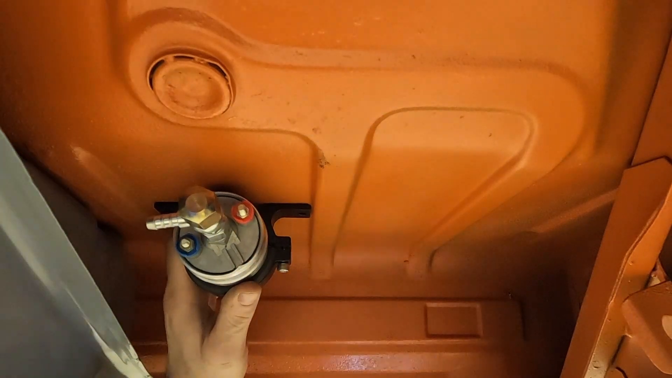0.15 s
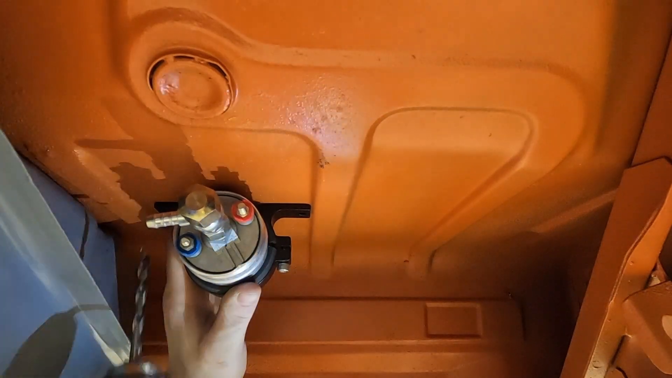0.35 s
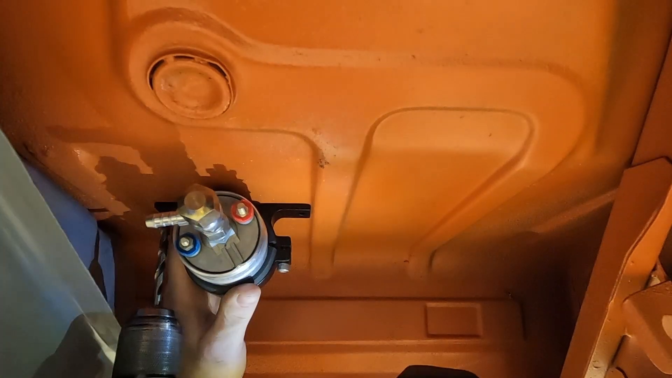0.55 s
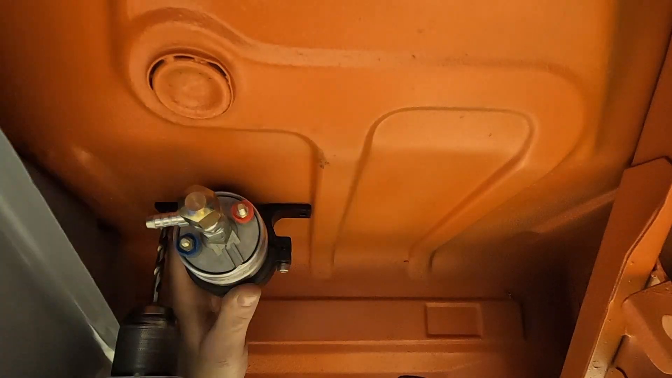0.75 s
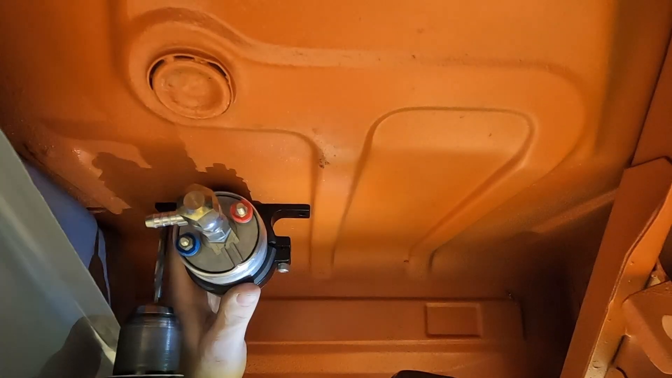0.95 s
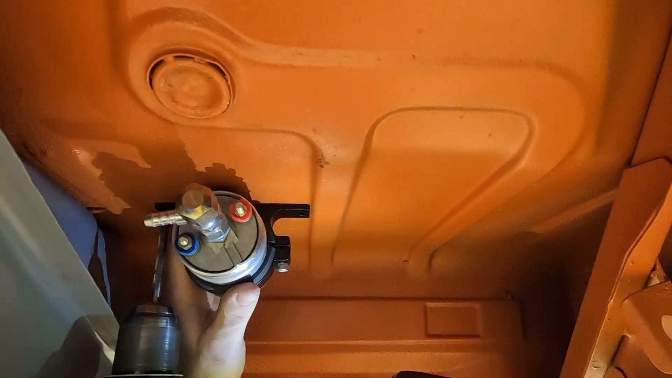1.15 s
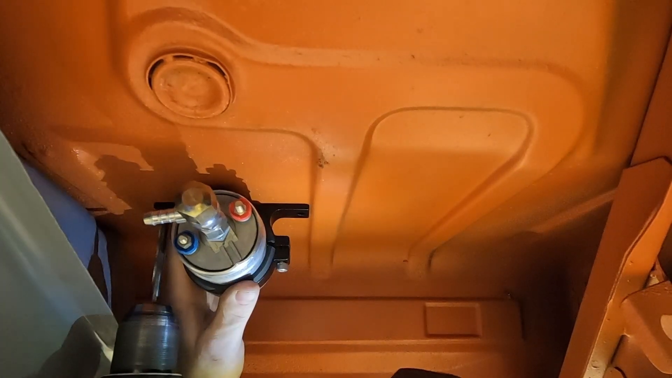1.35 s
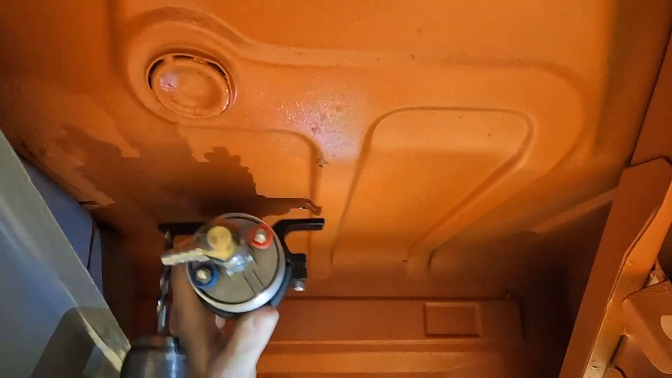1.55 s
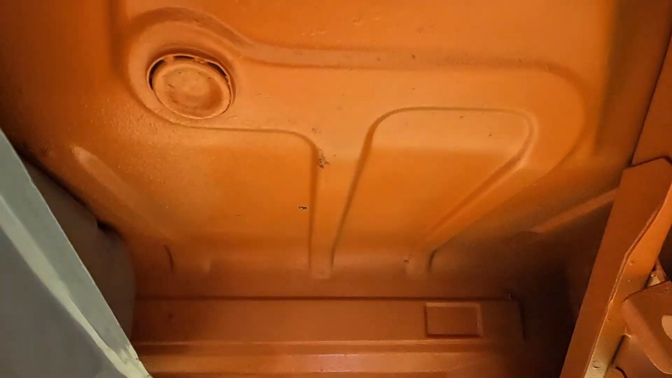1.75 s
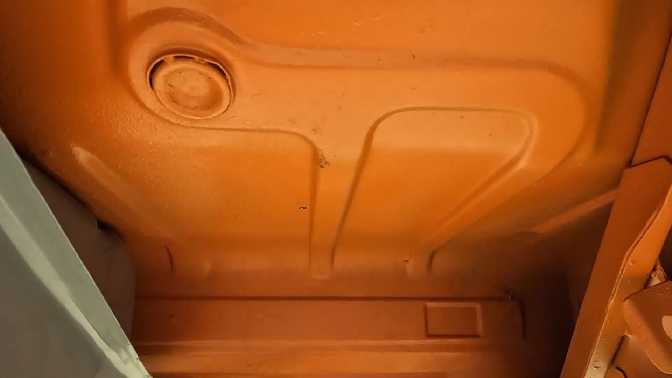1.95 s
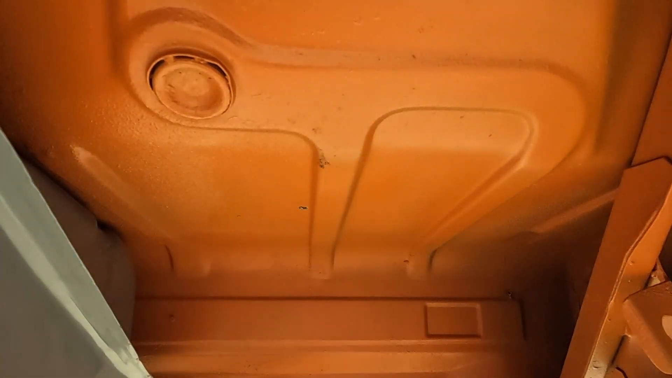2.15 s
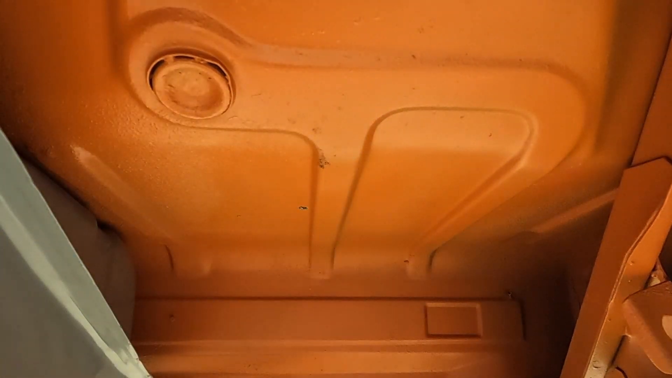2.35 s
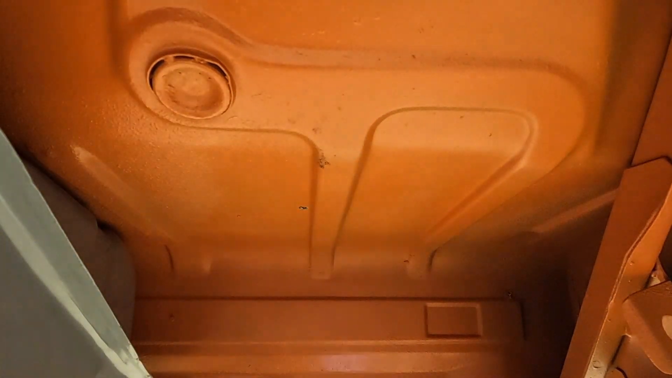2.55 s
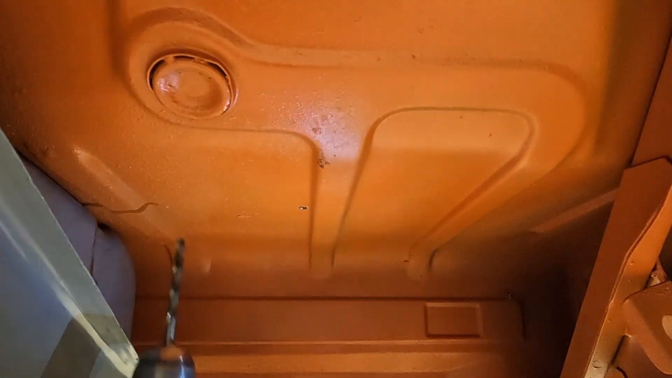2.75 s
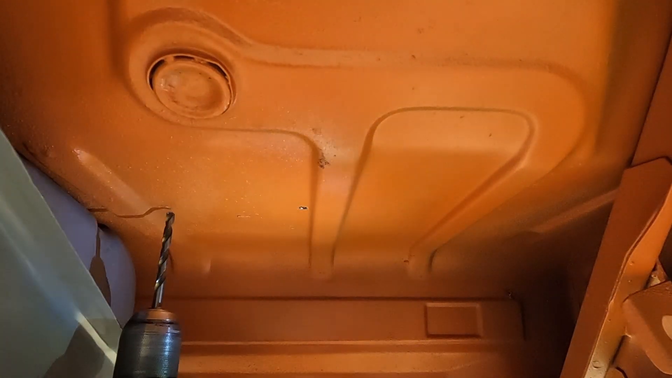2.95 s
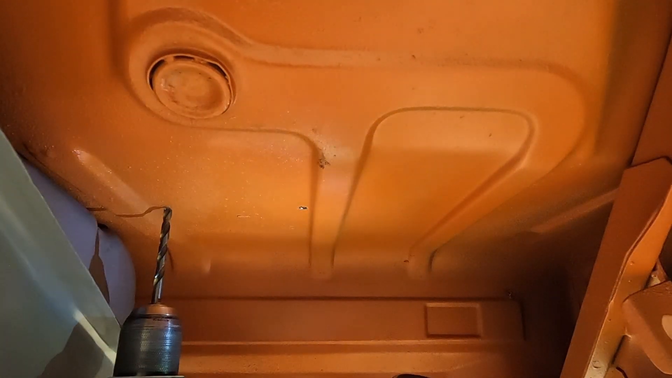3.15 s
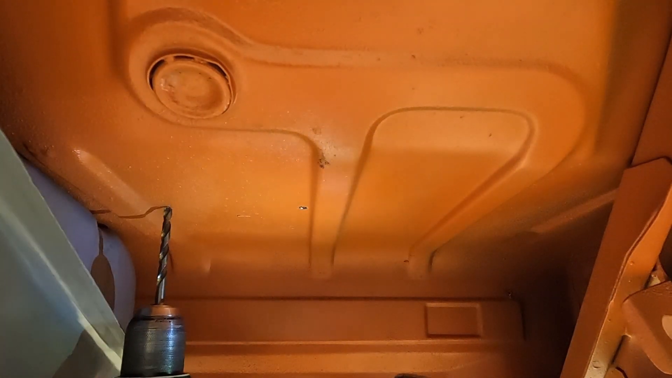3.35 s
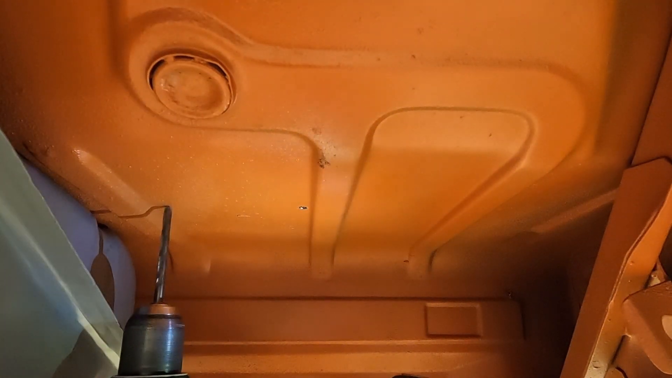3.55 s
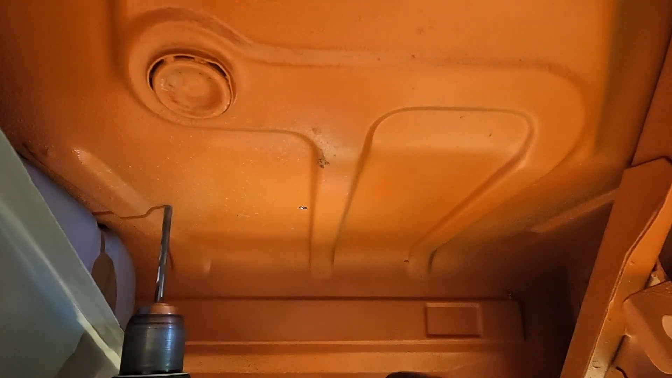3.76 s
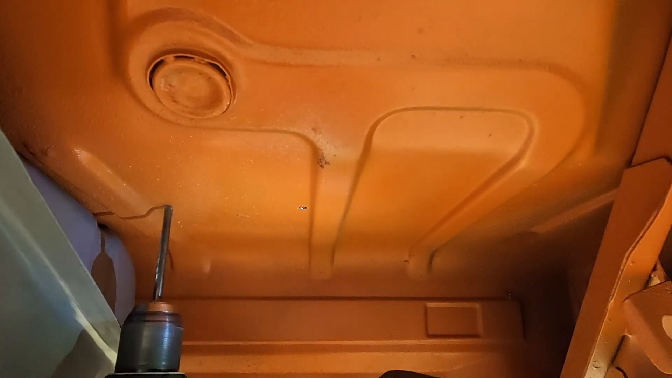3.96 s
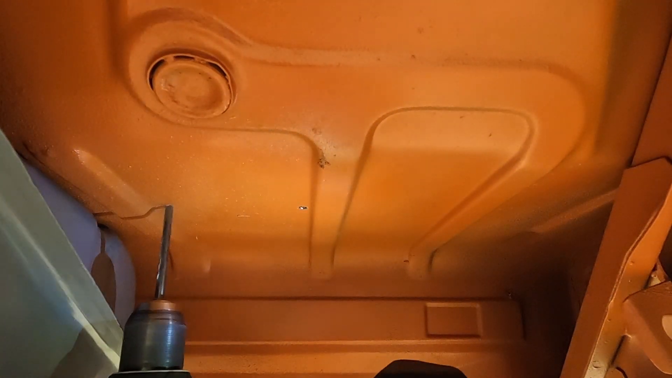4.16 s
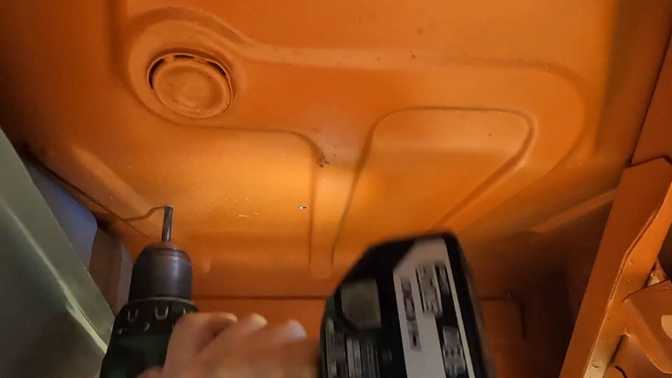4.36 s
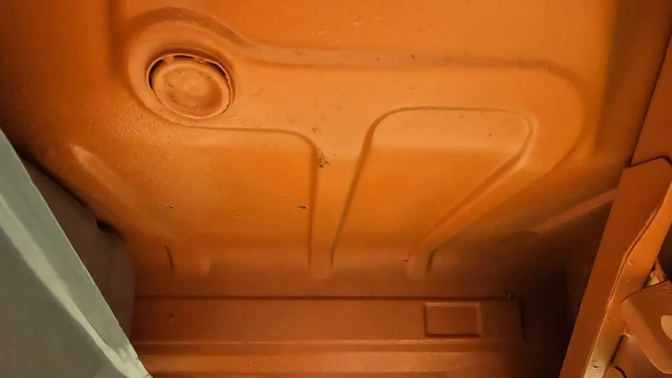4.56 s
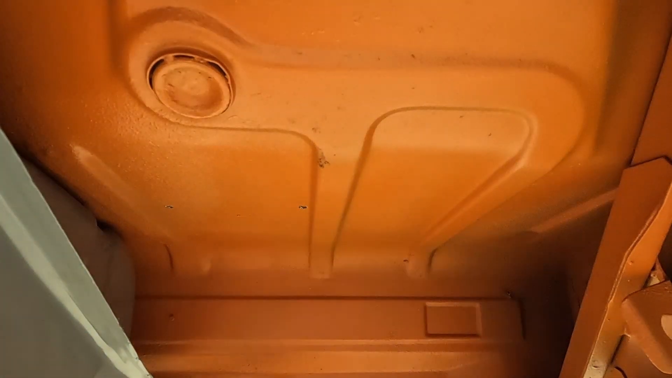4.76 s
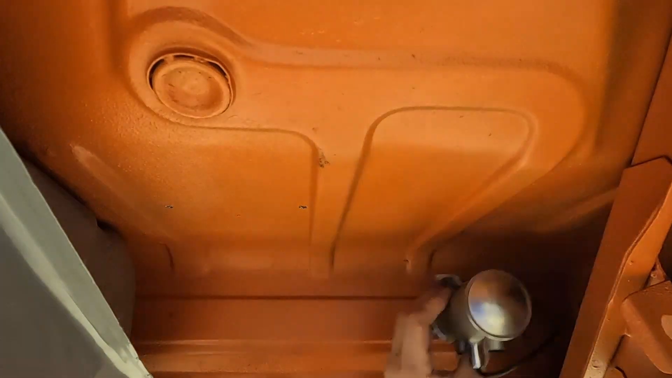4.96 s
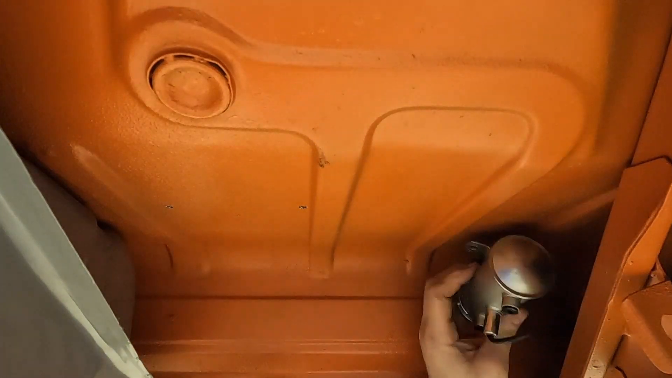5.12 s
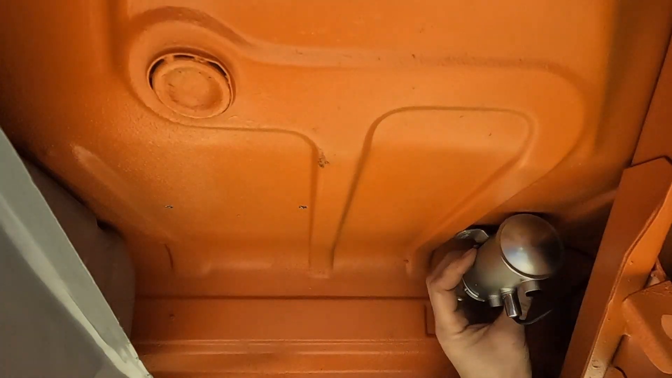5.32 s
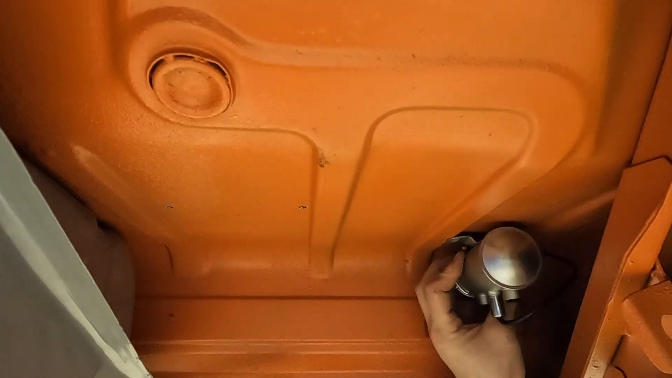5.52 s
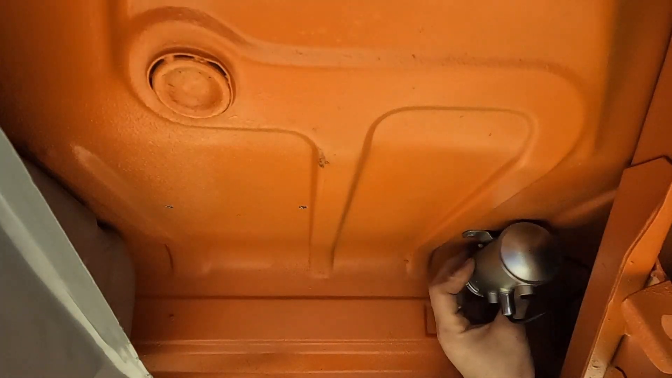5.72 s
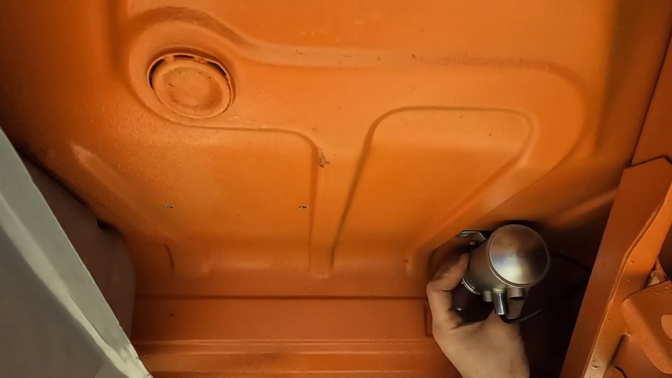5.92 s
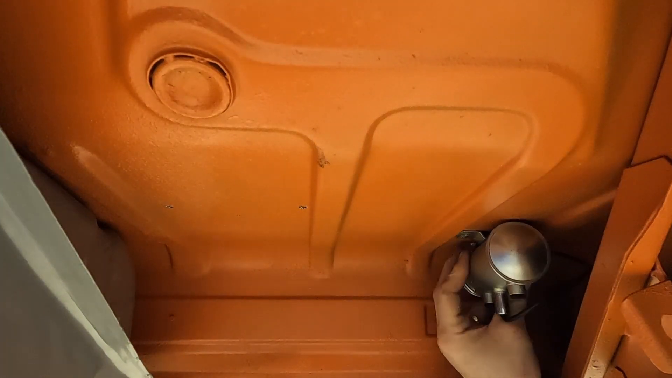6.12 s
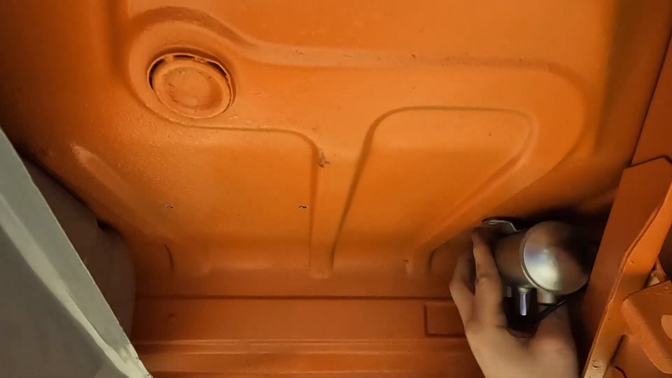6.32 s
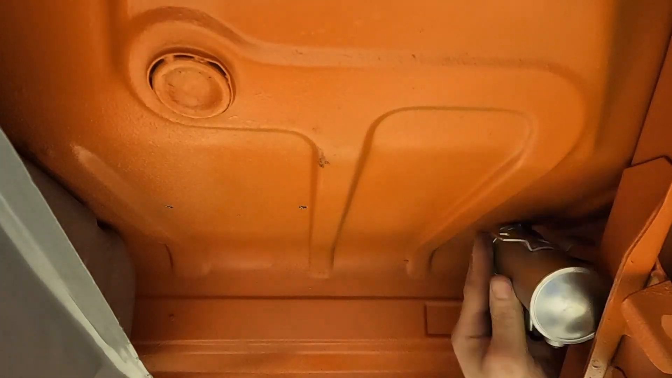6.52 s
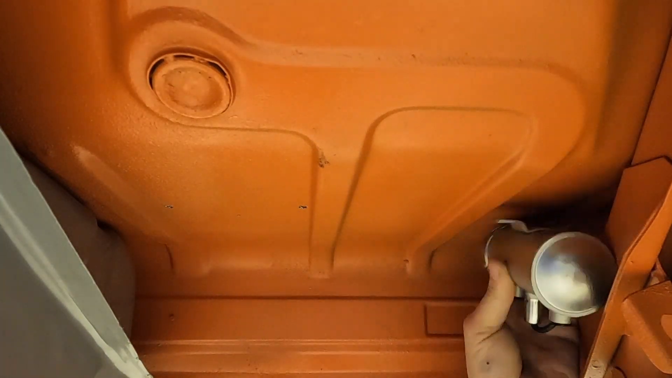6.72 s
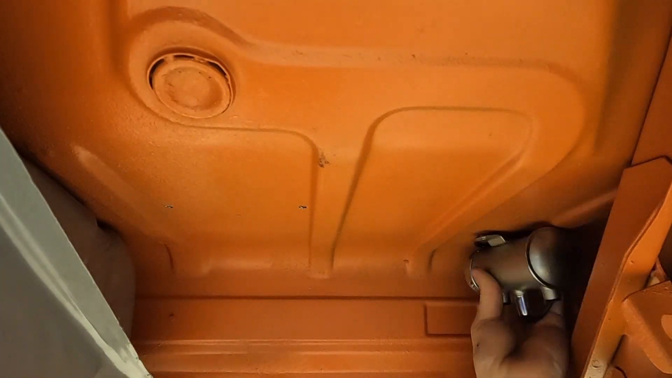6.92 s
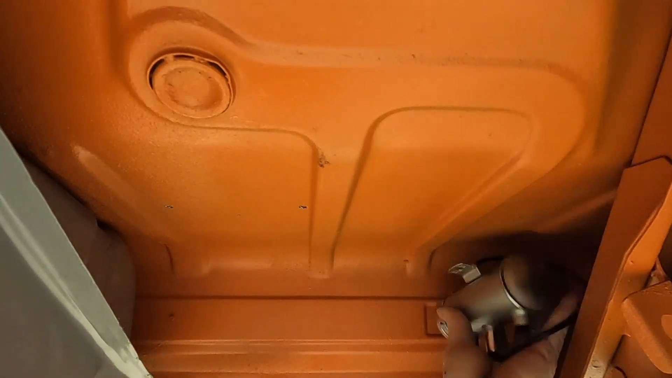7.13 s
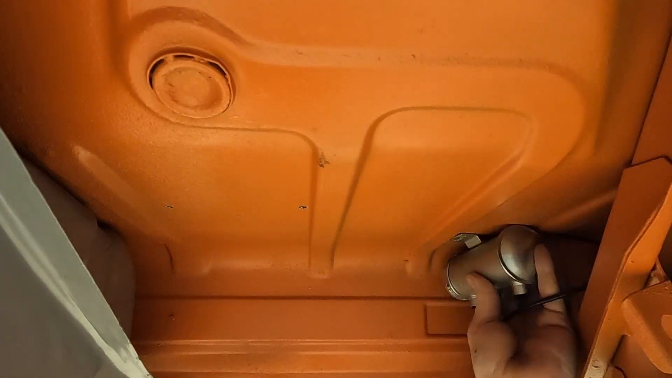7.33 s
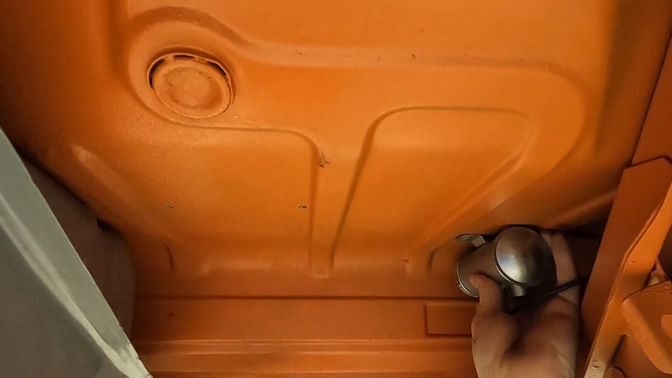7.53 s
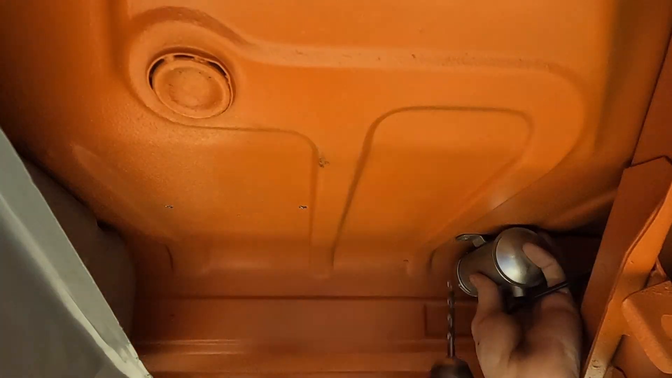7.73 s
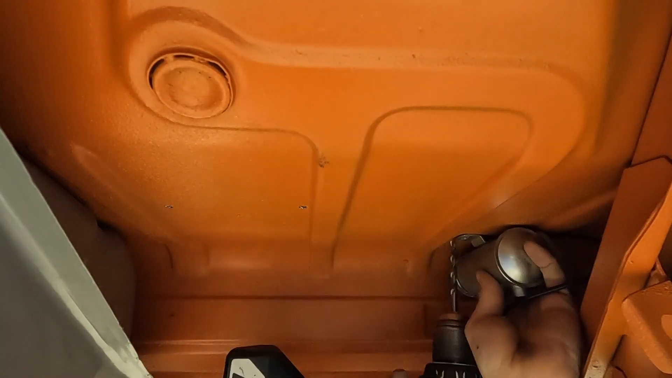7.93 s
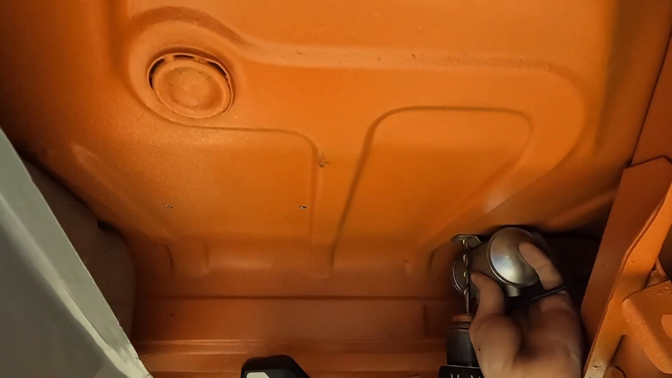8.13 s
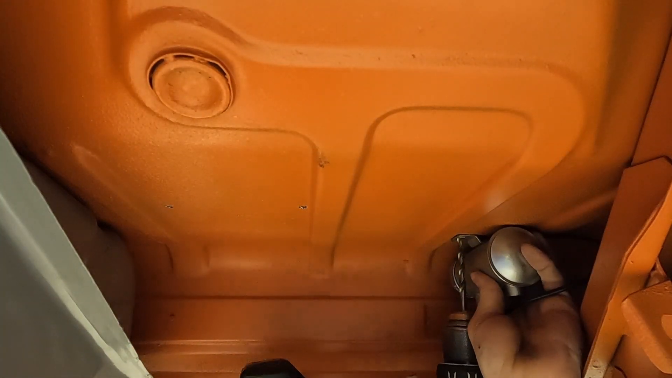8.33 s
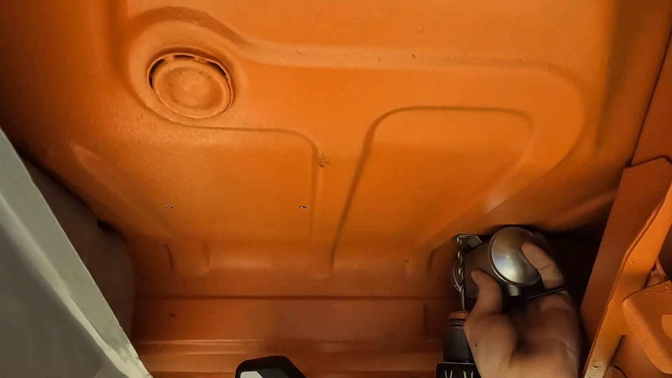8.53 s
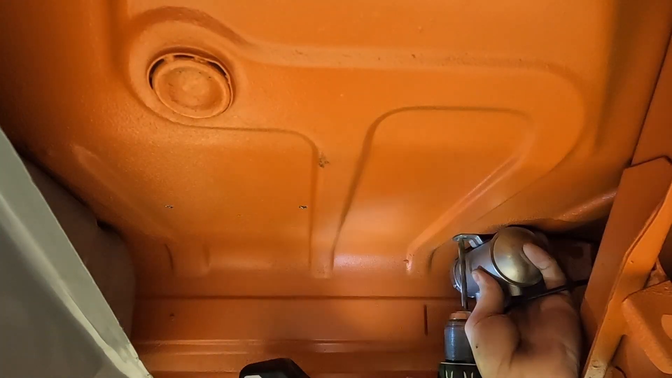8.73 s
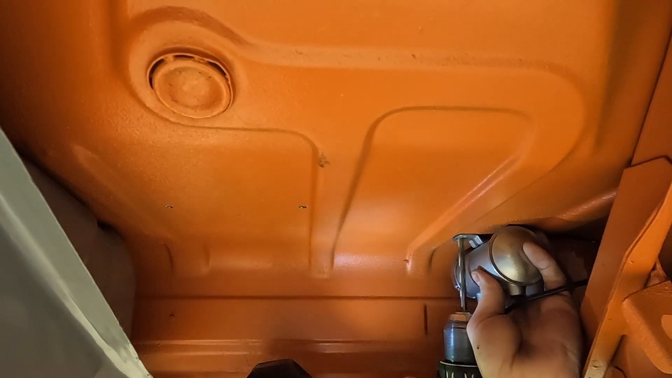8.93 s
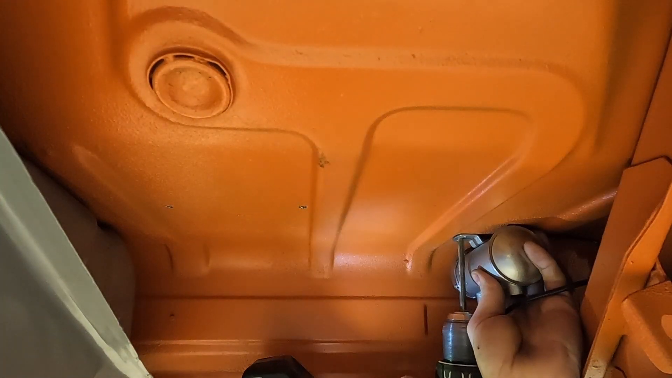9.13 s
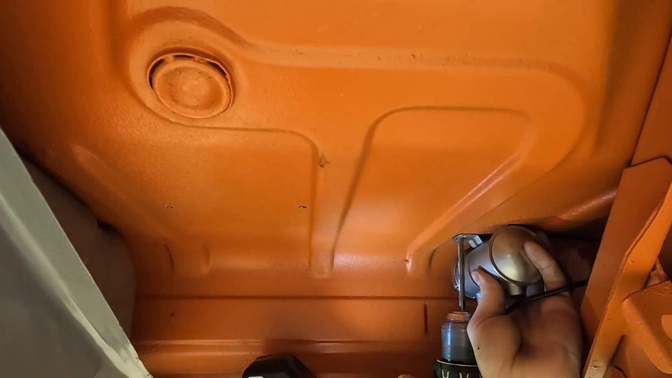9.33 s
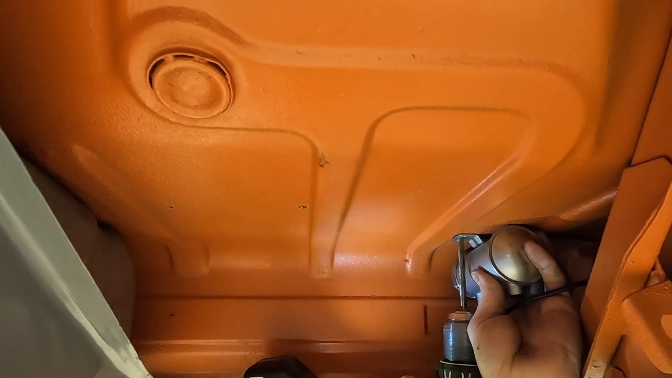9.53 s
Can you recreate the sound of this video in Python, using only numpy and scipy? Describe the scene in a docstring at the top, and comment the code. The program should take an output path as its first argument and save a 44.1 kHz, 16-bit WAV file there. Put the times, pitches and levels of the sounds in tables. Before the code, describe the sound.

A cordless drill bores sheet steel in three whining, gritty bursts, the second chattering hard, with metal parts knocking and sliding on the panel between.

```python
"""A cordless drill bores sheet steel in three bursts, heard by two close microphone ports in a garage.
Motor and gear tones follow the speed; filtered noise makes the chip hiss, grind, panel shake and rattle.
Before and between the bursts a metal part slides and knocks: rough contacts ring the panel and the part.
Cloth rustles and a small metal ping lie near; room air, a low hum and a lamp whine lie behind.
The ports add delay, shading and wall sound; a gain control and a band limit follow."""
import sys
import numpy as np
from scipy import signal
from scipy.fft import rfft, irfft, next_fast_len
from scipy.io import wavfile
from scipy.ndimage import uniform_filter1d

SR = 44100
rng = np.random.default_rng(int(sys.argv[2]) if len(sys.argv) > 2 else 0)


def materialize(psi):
    """Save the field psi as 16-bit PCM at rate SR to the path in sys.argv[1].

    A 1-D psi becomes a single channel; in a 2-D psi each row is a channel.
    """
    bounded = np.clip(np.atleast_2d(psi).T, -1, 1)
    quanta = np.round(bounded * 32767).astype(np.int16)
    wavfile.write(sys.argv[1], SR, quanta)


N = 422478  # samples

# Colour of scraping grains and of faint cloth. Each row: frequency in Hz, relative level in dB per Hz.
GRIT_COLOUR = [(900, -10), (1500, -4), (3200, -12.5), (6100, -22.5), (9000, -34.5), (14800, -58)]


def gain_of(db):
    """Amplitude factor of a level in dB."""
    return 10 ** (np.asarray(db) / 20)


def evened(x):
    """Scales x to rms 1."""
    return x / np.sqrt(np.mean(x ** 2) + 1e-20)


def read(points, hz):
    """Reads a curve of (Hz, value) points along log frequency."""
    f, value = np.transpose(points)
    return np.interp(np.log(hz + 1), np.log(f + 1), value)


def add(mix, s, sound):
    """Lays a sound into the mix from s seconds on."""
    part = mix[round(s * SR):][:len(sound)]
    part += sound[:len(part)]


def unroll(rows):
    """Start time and every further column at sample rate."""
    s, *columns = np.transpose(rows)
    t = np.arange(s[0], s[-1], 1 / SR)
    return s[0], [np.interp(t, s, c) for c in columns]


def coloured(x, spectrum):
    """Filters x by a spectrum of (Hz, dB) points, then scales it to rms 1."""
    size = next_fast_len(len(x))
    gain = gain_of(read(spectrum, np.fft.rfftfreq(size, 1 / SR)))
    return evened(irfft(rfft(x, size) * gain, size)[:len(x)])


def rung(x, modes):
    """x drives resonant modes of (Hz, width in Hz, dB)."""
    out = np.zeros(len(x))
    for hz, width, db in modes:
        pole = np.exp((2j * np.pi * hz - np.pi * width) / SR)
        out += gain_of(db) * signal.lfilter([1 - abs(pole)], [1, -pole], x).imag
    return out


def drift(size, s):
    """Smooth chance of rms 1 that changes over s seconds."""
    span = max(round(s * SR), 2)
    return evened(uniform_filter1d(uniform_filter1d(rng.standard_normal(size), span), span))


def tone(hz, db, waver_db):
    """A sine on a pitch curve whose level wavers."""
    level = gain_of(db + waver_db * drift(len(hz), 0.022))
    return np.sqrt(2) * level * np.sin(2 * np.pi * np.cumsum(hz) / SR)


def motor(speed, blur_db, slow_db, whine_db):
    """Whine, octave and gear mesh on the speed, loud where they meet a resonance of the casing."""
    # Each row: frequency in Hz, loudness through the casing in dB.
    casing = [(200, -46.5), (550, -29), (900, -29), (1130, -18), (1260, -19.5), (1400, -27), (1560, -60.5),
              (2150, -48), (2320, -20), (2520, -23.5), (2750, -18.5), (2830, -30), (3400, -38),
              (3900, -46.5), (4850, -33.5), (5300, -45), (6000, -30)]
    # Whine, its octave, gear mesh. Each row: multiple of the speed, waver in dB.
    motor_tones = [(2, 1.5), (4, 3), (7, 2)]
    out = 0
    for k, waver_db in motor_tones:
        db = read(casing, k * speed) + blur_db
        db = db + whine_db * (k == 2) + slow_db * (k == 7)
        out = out + tone(k * speed, db, waver_db)
    return out


def gears(speed, level_db):
    """Fainter gear tones lie at fixed multiples of the speed."""
    # Each entry: multiple of the speed.
    multiples = [1.24, 5.2, 10.4]
    # Each entry: level of that tone in dB against the given level.
    gear_db = [-23, -9, -14]
    return sum(tone(k * speed, level_db + db, 4.0) for k, db in zip(multiples, gear_db))


def chip_hiss(hiss_db, flicker):
    """Flickering noise of the cutting, with a brighter, weaker hiss for the sides."""
    # Each row: frequency in Hz, relative level in dB per Hz.
    hiss_colour = [(880, -38), (1500, -7.5), (1960, -19.5), (3070, 4.5), (3790, 0), (7700, -4.5),
                   (8500, -13), (10500, -12.5), (12500, -20.5), (13800, -36.5), (14800, -100.5)]
    size = len(flicker)
    direct = coloured(rng.standard_normal(size) * flicker, hiss_colour)
    scattered = coloured(rng.standard_normal(size) * flicker, hiss_colour)
    scattered = evened(np.diff(scattered, prepend=0))  # the step between samples is brighter
    return gain_of(hiss_db) * direct, gain_of(hiss_db - 11.5) * scattered


def cutting_edges(grab_db, stop_db, flicker, tilt_db, shake_db, grind_db):
    """Uneven bites grind the steel, shake the panel and rattle the loose bit in its hole."""
    # Each row: frequency in Hz, relative grind level in dB per Hz.
    grind_colour = [(300, -27.5), (550, -2), (850, -1), (1170, 4), (1900, -5.5), (2400, -3), (3500, -34.5)]
    # Modes of the bit in its hole. Each row: frequency in Hz, width in Hz, relative level in dB.
    rattle_modes = [(1070, 50, -2), (1230, 60, -2), (1440, 68, -5.5), (1780, 80, -6.5), (2170, 60, -6.5),
                    (2400, 40, -2), (2560, 62, -5.5)]
    size = len(flicker)
    bites = gain_of(3.26 * drift(size, 0.017))
    grind = coloured(rng.standard_normal(size) * flicker * np.sqrt(bites), grind_colour)
    shake = evened(panel(rng.standard_normal(size) * bites, tilt_db))
    rattle = evened(rung(rng.standard_normal(size) ** 3 * bites, rattle_modes))  # cubed: sparse hits
    out = gain_of(grind_db + grab_db + .6 * stop_db) * grind
    out += gain_of(shake_db + 0.99 * grab_db + .3 * stop_db) * shake
    return out + gain_of(-54 + 2.21 * grab_db + stop_db) * rattle


def speed_switch(speed, coast_db):
    """The switch chops the current at a fixed pitch; turning splits the tone in two."""
    chop_hz = 9960
    # the single tone sinks with the highest speed so far and does not come back
    out = tone(chop_hz + 0 * speed, -34 - 0.1 * np.maximum.accumulate(speed), 4.1)
    # the pair is weak near standstill and fades again near full trigger
    split_db = -42 - 0.17 * np.maximum(speed - 570, 0) - .3 * np.maximum(110 - speed, 0) + coast_db
    out += tone(chop_hz + 2 * speed, split_db - 0.5, 1.7)
    return out + tone(chop_hz - 2 * speed, split_db, 1.5)


def drill(speed_rows, grab_rows, tilt_db, shake_db, grind_db, whine_db, release):
    """One burst: speed and grab curves drive tones and noises; returns direct and side sound."""
    start, (speed,) = unroll(speed_rows)
    size = len(speed)
    t = np.arange(size) / SR
    grab_db = np.interp(start + t, *np.transpose(grab_rows))
    # noise rises 419.5 dB a second, and stops by 1601.5 dB a second in the last 0.022 s of the curve
    stop_db = -1601.5 * np.maximum(t - t[-1] + .022, 0)
    hiss_db = -27.5 + np.minimum(419.5 * t - 21.5, 0) + stop_db
    # the hiss swells as the speed first passes 380 Hz
    hiss_db += 4.5 * np.exp(-((np.maximum.accumulate(speed) - 380) / 150) ** 2)
    # tones die by 903 dB a second once the trigger is released; the hiss sinks by 6 dB at most
    coast_db = -903 * np.maximum(start + t - release, 0)
    hiss_db += np.maximum(0.067 * coast_db, -6)
    # tones smear while the speed changes fast: dB for each Hz a second
    blur_db = coast_db - .0018 * abs(uniform_filter1d(np.gradient(speed) * SR, size=400))
    speed = speed * (1 + .0012 * drift(size, 0.011))
    slow_db = -0.074 * np.maximum(560 - speed, 0)  # gears sing only near full speed
    flicker = gain_of(drift(size, .004))
    out = motor(speed, blur_db, slow_db, whine_db)
    out += gears(speed, hiss_db + blur_db + slow_db)
    hiss, scattered = chip_hiss(hiss_db, flicker)
    out += hiss + cutting_edges(grab_db, stop_db, flicker, tilt_db, shake_db, grind_db)
    out += speed_switch(speed, coast_db)
    return start, np.array([out, scattered]) * signal.windows.tukey(size, .012)


def panel(force, tilt_db=0):
    """The sheet radiates its modes, tilted by dB per octave, and little below the lowest."""
    # Each row: mode frequency in Hz, width in Hz, relative level in dB before the tilt.
    panel_modes = [(161, 7.4, 1), (184, 34, -7.5), (193.3, 15, 4.5), (251, 120, -4.5), (296.6, 55, -1.5),
                   (437.2, 27, -10), (634, 170, -19)]
    modes = [(hz, width, db + tilt_db * np.log2(hz / 220)) for hz, width, db in panel_modes]
    low_cut = signal.butter(2, 120, "high", fs=SR, output="sos")
    return signal.sosfilt(low_cut, rung(force, modes))


def chatter():
    """The big bit chatters as it breaks through: a beat with overtones, and a rougher groan below."""
    # Each row: time in seconds, beat in Hz, level in dB.
    beat_rows = [(3.95, 164.1, -33.5), (4.03, 161.5, -14), (4.12, 158, -9.5), (4.27, 160.7, -13.5),
                 (4.38, 161, -15), (4.43, 136.7, -25.5), (4.53, 130.1, -18.5)]
    # The sixth harmonic swells once: time in seconds, half length in seconds, peak in dB.
    swell = (4.3, 0.092, -24.5)
    # The groan as the trigger is let go and the drill runs down: time in seconds, peak in dB,
    # rise and fall in dB per second.
    let_go = (4.4, -12, 498.5, 169.5)
    start, (hz, db) = unroll(beat_rows)
    t = start + np.arange(len(hz)) / SR
    swell_s, half_s, swell_db = swell
    sixth_db = swell_db - 8 * ((t - swell_s) / half_s) ** 2
    let_go_s, let_go_db, rise, fall = let_go
    before_db = np.minimum(rise * (let_go_s - t), 26)
    groan_db = let_go_db - np.maximum(before_db, fall * (t - let_go_s))
    out = tone(hz, db, 0.37)
    out += tone(2 * hz, db - 19.5, 5.4)
    out += tone(3 * hz, db - 22, 6.1)
    out += tone(6 * hz, sixth_db, 2.9)
    groan = evened(np.diff(rung(rng.standard_normal(len(hz) + 1), [(106.0, 9, 0)])))
    return start, (out + gain_of(groan_db) * groan) * signal.windows.tukey(len(hz), .08)


def squeal():
    """The bit's shank squeals as it bites: a narrow, rough ring that sinks in level."""
    # Start in seconds, end in seconds, frequency in Hz, level at the start in dB.
    shank = (3.85, 4.15, 2385, -19)
    start, end, hz, db = shank
    t = np.arange(0, end - start, 1 / SR)
    ring = evened(rung(rng.standard_normal(len(t)), [(hz, 60, 0)]))
    return start, gain_of(db - 30 * t / (t + 0.088)) * ring * signal.windows.tukey(len(t), .05)


def knock(s, panel_db, grit_db, contact, noise):
    """Rough contact that swells and lets go drives the panel, the part and a gritty hiss."""
    # Modes of the metal part. Each row: frequency in Hz before the grip shifts it, width in Hz, dB.
    part_modes = [(940, 160, 0), (1250, 220, 0), (1800, 200, -4), (2100, 260, -7)]
    # Bright edge of a contact. Each row: frequency in Hz, relative level in dB per Hz.
    tick_colour = [(3000, -23.5), (5000, -0.5), (7500, -6), (10000, -14), (14800, -27)]
    u = np.arange(len(noise)) / SR / np.clip(contact, .002, .08)
    press = u ** 1.6 * np.exp(1 - u ** 1.244)
    grains = noise[::-1] ** 3  # cubed: sparse grains snapping
    held = 1 + 0.16 * noise[-len(part_modes):]  # each grip shifts the modes of the part
    gripped = [(hz * k, width, db) for (hz, width, db), k in zip(part_modes, held)]
    ring = rung(uniform_filter1d(noise, size=8) * press, gripped)
    boom = panel(noise * press, 2.5 * noise[-1])  # each spot favours lower or higher modes
    ring_db = 0.48 * panel_db + 0.69 * grit_db + 4.5  # the part rings with both blow and scraping
    tick_db = 1.406 * grit_db - 0.25 * panel_db - 18.5  # light, scratchy contacts are the brightest
    out = gain_of(panel_db) * boom / abs(boom).max()
    out += gain_of(ring_db) * ring / abs(ring).max()
    out += gain_of(tick_db) * coloured(grains, tick_colour) * press ** 4.2
    out += gain_of(grit_db - 4.5) * coloured(grains, GRIT_COLOUR) * press ** 2.0
    return s - .55 * contact, out


def ping():
    """One light tap rings a few modes of a small piece of metal."""
    # Time in seconds, modes as rows of frequency in Hz, width in Hz and level in dB, then peak in dB.
    tap = (5.14, [(1700, 40, -11), (4150, 34, 1), (7300, 48, -2)], -38)
    s, modes, peak_db = tap
    ring = rung(signal.unit_impulse(4000), modes)
    return s, gain_of(peak_db) * ring / abs(ring).max()


def rustle(start, end, db):
    """Cloth drags in uneven little gusts of coloured noise."""
    # Each row: frequency in Hz, relative level in dB per Hz.
    cloth_colour = [(700, -14), (1300, 1.5), (2500, -6), (5000, -7.5), (8000, -17), (14800, -33.5)]
    size = round((end - start) * SR)
    gusts = gain_of(db + 3.9 * drift(size, 0.015)) * signal.windows.tukey(size, .8)
    return start, gusts * coloured(rng.standard_normal(size), cloth_colour)


def garage():
    """Patchy room air in each ear, faint rustling of cloth, low hum and lamp whine."""
    # Room air. Each row: frequency in Hz, relative level in dB per Hz.
    air_colour = [(60, -5.5), (110, -7), (350, -24.5), (840, -40.5), (1230, -26.5), (1500, -40),
                  (3400, -49.5), (7000, -47), (14800, -74.5)]
    # Wavering low hum. Each row: frequency in Hz, width in Hz, level in dB.
    hum_rows = [(54.5, 6.2, -43.5)]
    # Lamp whine. Each row: frequency in Hz, level in dB.
    lamp_rows = [(4404, -78), (4506, -78), (4603, -80)]
    shared, *apart = [coloured(rng.standard_normal(N), air_colour) for _ in range(3)]
    air = (shared + 0.16 * np.array(apart)) * gain_of(-51 + 1.2 * drift(N, 0.035))
    cloth = np.array([coloured(rng.standard_normal(N), GRIT_COLOUR) for _ in range(2)])
    cloth *= gain_of(-71 + 3.5 * drift(N, .02))
    hum = 0
    for hz, width, db in hum_rows:
        hum = hum + gain_of(db) * evened(rung(rng.standard_normal(N), [(hz, width, 0)]))
    lamp = sum(tone(np.full(N, hz), db, 1.5) for hz, db in lamp_rows)
    return air + cloth + hum + lamp


def ports(x):
    """Direct sound with the delay and shading of each port, plus a short wall tail, unlike in each."""
    # Each row: frequency in Hz, phase by which the left port leads in radians.
    lead = [(100, .05), (2000, 0.84), (3700, 1.5), (5600, 0.54), (14000, 0.82)]
    # Each row: frequency in Hz, left minus right level in dB.
    shading = [(100, -1), (600, 1.5), (8000, -0.6)]
    # Each row: frequency in Hz, walls against direct sound in dB.
    wall_level = [(100, -40.5), (500, -8), (2000, -10), (13000, -21.5)]
    t = np.arange(SR // 3) / SR
    # the tail falls 60 dB in 0.13 s and begins after 0.8 ms
    tails = rng.standard_normal((2, len(t))) * gain_of(-60 * t / 0.13) * (t > .0008)
    size = next_fast_len(N + len(t))
    hz = np.fft.rfftfreq(size, 1 / SR)
    half = gain_of(read(shading, hz) / 2) * np.exp(.5j * read(lead, hz))  # half the difference to each
    walls = gain_of(read(wall_level, hz)) * rfft(tails / np.linalg.norm(tails[0]), size)
    return irfft(rfft(x, size) * (np.array([half, 1 / half]) + walls), size)[:, :N]


def scene():
    """Places drill, part and cloth before the ports; side hiss is opposite in the two ears."""
    # One curve a hole. Each row: time in seconds, motor speed as half the commutation rate in Hz.
    speed_curves = [
        [(0.905, 12), (0.94, 48), (0.97, 360), (1.015, 545), (1.045, 600), (1.085, 631), (1.21, 633),
         (1.4, 615), (1.5, 628), (1.54, 628), (1.585, 520)],
        [(3.44, 11), (3.49, 70), (3.525, 300), (3.55, 550), (3.578, 666), (3.6, 680), (3.67, 686), (3.705, 699),
         (3.82, 704), (3.86, 765), (3.9, 848), (3.96, 871), (4.08, 858), (4.36, 850), (4.42, 790), (4.54, 600)],
        [(8.697, 10), (8.745, 60), (8.78, 330), (8.82, 460), (8.85, 515), (8.91, 550), (9.14, 590), (9.22, 662),
         (9.33, 693), (9.6, 695)],
    ]
    # How hard the cutting edges grab, one curve a hole. Each row: time in seconds, grab in dB.
    grab_curves = [
        [(0.905, -21.5), (0.94, -5.5), (0.97, 3), (1.015, 8), (1.06, -3), (1.25, 1.5), (1.42, 5), (1.53, 3.5),
         (1.565, 7.5)],
        [(3.44, -25.5), (3.46, 3.5), (3.485, 0), (3.505, 8), (3.54, 9), (3.57, -3), (3.83, -2.5), (3.865, 11),
         (3.95, 11.5), (4.3, 9), (4.42, 11.5), (4.5, 10.5)],
        [(8.697, -20.5), (8.745, -5.5), (8.79, 4.5), (8.87, 4.5), (8.96, 0.5), (9.13, -3), (9.16, 4),
         (9.2, -6.5), (9.33, 2), (9.6, 0.5)],
    ]
    # Each row, one a hole: tilt of the panel modes in dB per octave, panel shake in dB, grind in dB,
    # whine in dB against the casing curve, trigger release in seconds.
    holes = [(-15.5, -26, -33, 0.5, 1.56), (0, -31, -33.5, 1.5, 4.385), (6, -22, -33, -6.5, 9.7)]
    # Knocks and slides. Each row: time in seconds, panel peak in dB, grit drive in dB,
    # contact time in seconds.
    knock_rows = [(0.586, -37.5, -46.5, 0.011), (0.612, -25.5, -41, 0.0094), (0.647, -31.5, -39.5, 0.014),
                  (0.724, -17, -47.5, 0.011), (2.918, -37, -53, 0.019), (3.008, -14, -40, 0.011),
                  (3.083, -21, -57.5, 0.0078), (3.159, -13.5, -39.5, 0.0049), (3.289, -28, -59.5, 0.011),
                  (5.331, -7, -45.5, 0.0089), (5.416, -18, -43, 0.013), (5.449, -18, -40.5, 0.0074),
                  (5.499, -18.5, -39, 0.024), (5.537, -9.5, -39.5, 0.0083), (5.599, -15.5, -43, 0.021),
                  (5.624, -5, -26, 0.011), (5.805, -21, -41, 0.014), (5.926, -31.5, -47.5, 0.012),
                  (6.193, -32, -24, 0.01), (6.267, -27, -47.5, 0.013), (6.3, -16, -33.5, 0.026),
                  (6.345, -5.5, -24, 0.023), (6.377, -5, -24.5, 0.015), (6.449, -22.5, -51, 0.016),
                  (6.54, -19, -33.5, 0.015), (6.592, -10.5, -36, 0.013), (6.663, -13.5, -38.5, 0.012),
                  (6.707, -24.5, -37, 0.011), (6.796, -16.5, -39.5, 0.023), (6.83, -21, -37.5, 0.02),
                  (6.889, -4, -24.5, 0.0065), (6.928, -16, -34.5, 0.011), (6.973, -22.5, -54, 0.0093),
                  (7.016, -22, -43.5, 0.0065), (7.042, -19, -33.5, 0.0052), (7.092, -19.5, -49, 0.014),
                  (7.283, -21.5, -26, 0.0082), (7.311, -25, -47, 0.01), (7.36, -16.5, -51.5, 0.021),
                  (7.387, -10, -32.5, 0.01), (7.494, -15.5, -28, 0.0073), (7.562, -22.5, -37.5, 0.0091),
                  (7.604, -28.5, -46, 0.0089), (7.89, -16, -30.5, 0.0074), (7.97, -20.5, -38, 0.0062),
                  (7.996, -24, -29, 0.0092), (8.024, -21, -42.5, 0.008), (8.113, -34.5, -61.5, 0.0079),
                  (8.157, -17.5, -41, 0.0089), (8.18, -23, -47, 0.011), (8.268, -36.5, -48, 0.015),
                  (8.337, -22.5, -38, 0.0096)]
    # Cloth and hands moving. Each row: start in seconds, end in seconds, level in dB.
    rustle_rows = [(0.1, 0.555, -73), (1.82, 1.947, -64.5), (2.1, 2.609, -63.5), (2.661, 2.83, -53),
                   (3.299, 3.417, -62.5), (5.031, 5.126, -59), (5.17, 5.361, -53), (5.898, 6.2, -61.5),
                   (7.148, 7.243, -57.5), (7.648, 7.85, -72), (8.372, 8.42, -56), (8.517, 8.681, -55.5)]
    near, wide = np.zeros((2, N))
    for speed_rows, grab_rows, hole in zip(speed_curves, grab_curves, holes):
        start, (direct, scattered) = drill(speed_rows, grab_rows, *hole)
        add(near, start, direct)
        add(wide, start, scattered)
    add(near, *chatter())
    add(near, *squeal())
    for row in knock_rows:
        add(near, *knock(*row, rng.standard_normal(6144)))
    add(near, *ping())
    for row in rustle_rows:
        add(near, *rustle(*row))
    return ports(near) + np.array([wide, -wide]) + garage()


def record(dry):
    """Gain control turns loud moments down a little and recovers; then the band limit."""
    power_db = 10 * np.log10(abs(uniform_filter1d((dry ** 2).mean(0), 800)) + 1e-12)
    fall = np.arange(N) * 22.0 / SR  # the held level falls this many dB a second
    held_db = np.maximum.accumulate(power_db + fall) - fall
    over_db = np.maximum(held_db + 19.5, 0)  # threshold -19.5 dB
    ducked = dry / gain_of(0.12 * uniform_filter1d(over_db, 400))
    band_limit = signal.firwin(511, 14900, window=("kaiser", 9), fs=SR)  # edge in Hz
    return signal.oaconvolve(ducked, band_limit[None], "same")


dry = scene()
out = record(dry)
materialize(out)
```